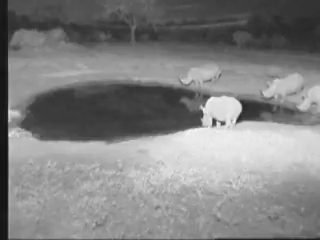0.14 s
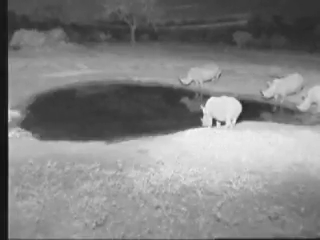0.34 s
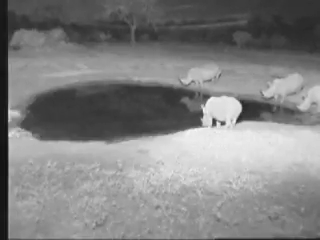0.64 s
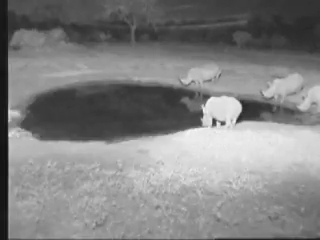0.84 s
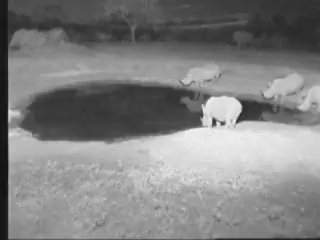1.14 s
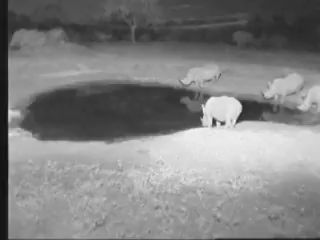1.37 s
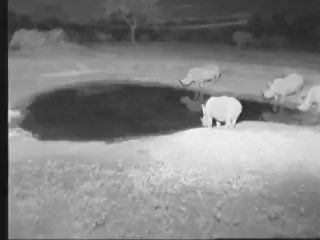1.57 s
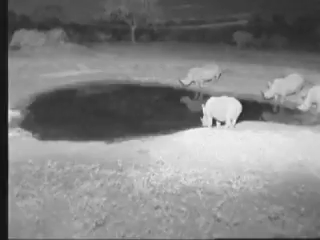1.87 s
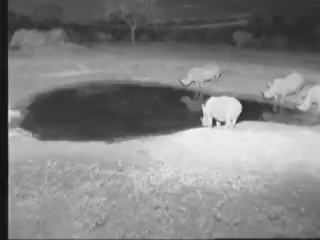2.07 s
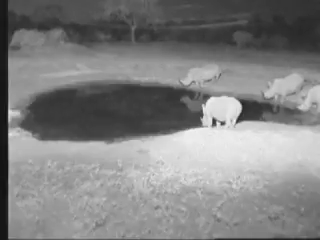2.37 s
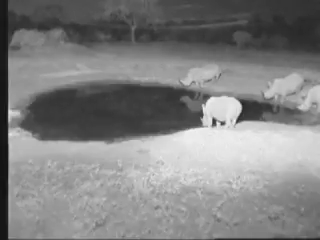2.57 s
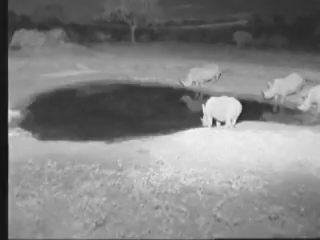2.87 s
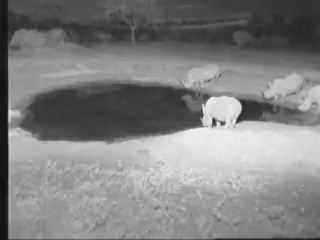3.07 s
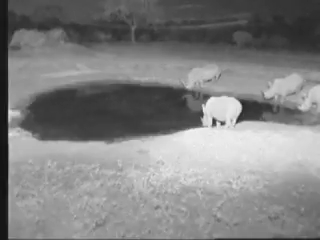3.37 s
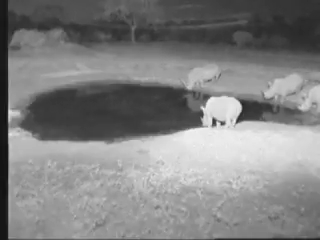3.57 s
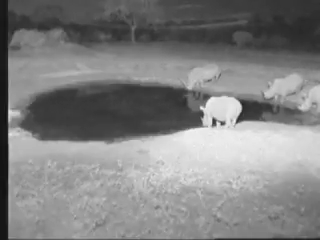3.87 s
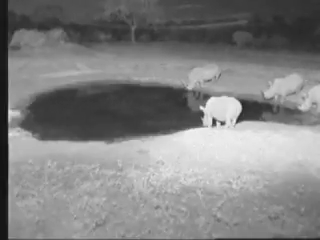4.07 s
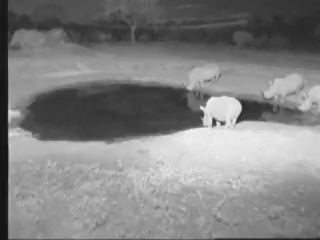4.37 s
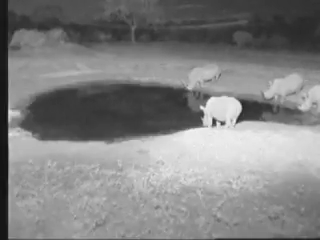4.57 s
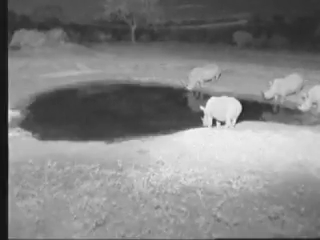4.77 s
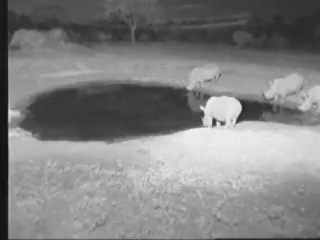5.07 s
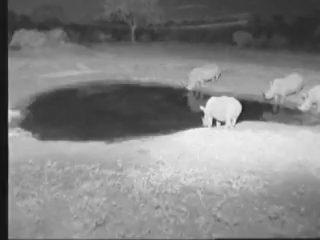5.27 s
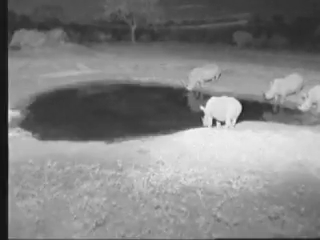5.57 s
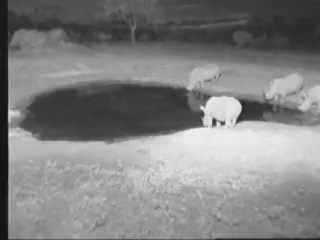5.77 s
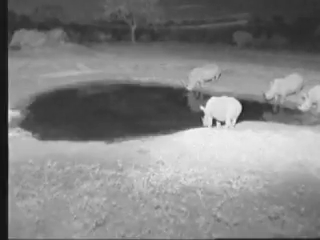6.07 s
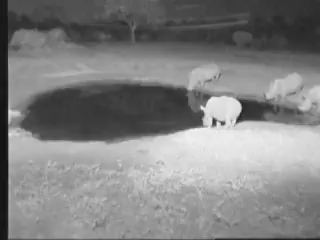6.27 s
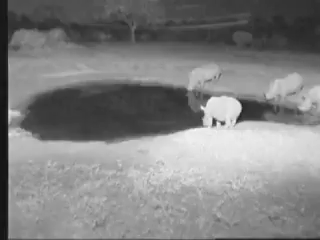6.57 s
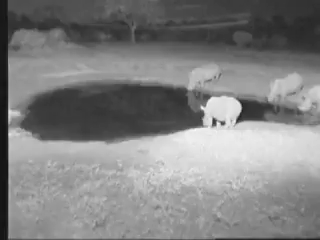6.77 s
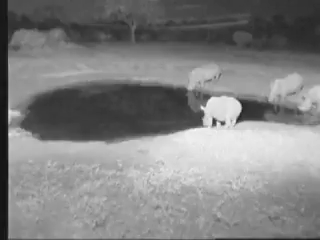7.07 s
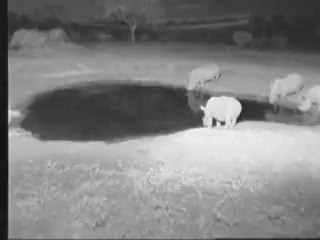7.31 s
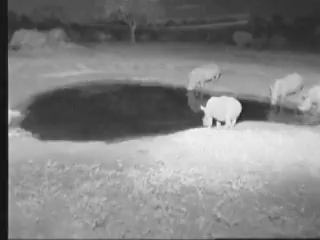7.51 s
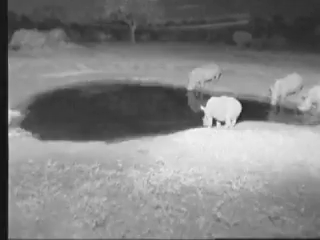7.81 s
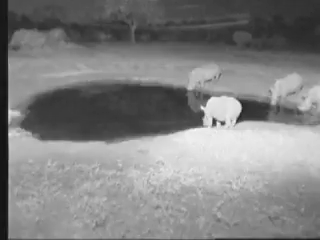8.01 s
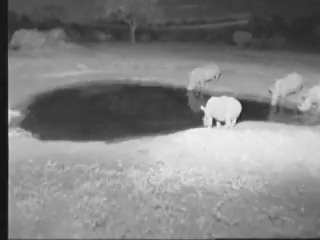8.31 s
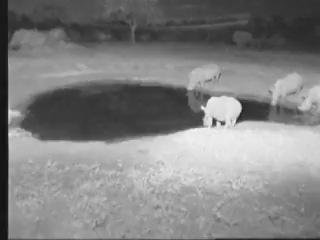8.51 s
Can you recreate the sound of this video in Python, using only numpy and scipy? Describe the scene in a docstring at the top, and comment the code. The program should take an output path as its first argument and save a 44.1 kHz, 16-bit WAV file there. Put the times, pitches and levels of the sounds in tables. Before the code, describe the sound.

Steady electrical hum, buzz and hiss over a night waterhole, with rhinos sloshing and dripping water before one loud, distorted breathy snort.

```python
"""Night waterhole with a snort

Night at a waterhole, heard by a fixed camera's single microphone. Mains hum, picture buzz (summed lines),
low thumps and hiss (shaped noise) never stop. Large animals slosh (bubble crackle through resonances) and
drip (short rising rings with splashes) at the water's edge; one draws breath and blows a loud snort
(noise through resonances) that overloads the input. A gulp is a gliding tone, far trickles narrow noise."""
import sys
import numpy as np
from scipy import signal
from scipy.fft import rfft, irfft, next_fast_len
from scipy.io import wavfile
from scipy.ndimage import uniform_filter1d, map_coordinates

SR = 44100
rng = np.random.default_rng(int(sys.argv[2]) if len(sys.argv) > 2 else 0)


def gain_from_decibels(decibels):
    """Convert decibel values to linear amplitude factors."""
    exponent = np.asarray(decibels, float) / 20
    return 10 ** exponent


def generate_wav(sig):
    """Save sig (samples, or channels by samples) to the path in sys.argv[1] as 16-bit PCM at SR."""
    pcm = np.round(np.clip(np.atleast_2d(sig).T, -1, 1) * 32767).astype(np.int16)
    wavfile.write(sys.argv[1], SR, pcm)


N = 381465
FIELD_HZ = 50  # picture fields; two make a frame


def unit(x):
    """Scales to rms 1."""
    return x / np.sqrt(np.mean(x ** 2) + 1e-20)


def along(points, hz):
    """Interpolates (frequency [Hz], value) points on a log frequency axis."""
    f, v = np.transpose(points)
    return np.interp(np.log(hz + 1), np.log(f + 1), v)


def curves(rows):
    """One curve per column after the time, then a gate open between the first and last row."""
    s, *cols = np.transpose(rows)
    t = np.arange(N) / SR
    gate = uniform_filter1d(1. * (t > s[0]) * (t < s[-1]), size=200)
    return [np.interp(t, s, c) for c in cols] + [gate]


def wobble(rate_hz):
    """Smooth random curve with rate_hz knots a second."""
    knots = rng.standard_normal(int(N * rate_hz / SR) + 4)
    return map_coordinates(knots, [np.arange(N) * rate_hz / SR])


def filtered(x, response):
    """x times a response of frequency."""
    m = next_fast_len(N + SR // 2)
    return irfft(rfft(x, m) * response(np.fft.rfftfreq(m, 1 / SR)), m)[..., :N]


def resonant(x, modes, low_hz):
    """x through parallel resonances of alternating sign, steeply cut below low_hz; rms 1."""
    def response(f):
        total = 0
        for k, (center_hz, width_hz, db) in enumerate(modes):
            damping = 1j * f * width_hz
            total = total + (-1) ** k * gain_from_decibels(db) * damping / (center_hz ** 2 - f * f + damping)
        return total / (1 + (low_hz / (f + 1)) ** 8)
    return unit(filtered(x, response))


def grainy(rate_hz, depth_db):
    """Noise whose strength flickers, as from many tiny bursts."""
    return rng.standard_normal(N) * gain_from_decibels(depth_db * wobble(rate_hz))


def crackle(rate_hz, depth_db, hush):
    """Tiny bursting bubbles: sparse clicks of scattered size, plus grainy noise scaled by hush."""
    size_db = depth_db * np.minimum(rng.exponential(size=N), 3)
    clicks = (rng.random(N) < rate_hz / SR) * rng.choice([-1, 1], size=N) * gain_from_decibels(size_db)
    return unit(clicks) + hush * grainy(200, 4.0)


def hum():
    """A rectifier draws two opposite pulses a cycle: odd multiples only, the higher ones lagging."""
    # mains lines: (multiple, level [dB rms])
    partials = [(1, -37.5), (3, -33), (5, -35.5), (7, -42), (9, -45.5), (11, -49), (15, -55.5), (17, -55)]
    mains_hz = 49.867
    turn = 2 * np.pi * mains_hz * np.arange(N) / SR - .07 + .05 * wobble(.5)
    out = np.zeros(N)
    for k, db in partials:
        phase = 2.93 - .23 * k - 2.03 * np.log(k)
        out += np.sqrt(2) * gain_from_decibels(db + 0.23 * wobble(7.5)) * np.cos(k * turn + phase)
    return out


def picture_buzz():
    """Each picture field leaks a slow sag and one sharp spike; the sag beats slowly against the mains."""
    # slow part: (multiple of field rate, level [dB rms])
    sag_lines = [(1, -42), (2, -48)]
    # sharp part: (frequency [Hz], level [dB rms per line])
    spike_levels = [(150, -55), (500, -59), (900, -59), (2000, -66), (6000, -68.5)]
    turn = 2 * np.pi * FIELD_HZ * np.arange(SR // FIELD_HZ) / SR
    sag = sum(gain_from_decibels(db) * np.cos(k * (turn + .7) - 2.6) for k, db in sag_lines)
    spike = sum(gain_from_decibels(along(spike_levels, k * FIELD_HZ)) * np.cos(k * (turn + 1.55) + .3)
                for k in range(3, 130))
    return np.sqrt(2) * (np.resize(sag, N) + np.resize(spike, N) * gain_from_decibels(0.23 * wobble(30)))


def hiss():
    """Amplifier noise, rising into the bass."""
    # relative noise spectrum: (frequency [Hz], density [dB per Hz])
    spectrum = [(8, 28.5), (25, 21), (50, 16), (80, 11), (200, 9.5), (600, 6), (1340, 0.5), (2230, -1.5),
                (5000, -0.5), (7150, 0), (7350, -31), (8200, -21.5), (11000, -21.5), (12600, -12.5),
                (12800, -62)]
    noise = filtered(rng.standard_normal(N), lambda hz: gain_from_decibels(along(spectrum, hz)) * (hz > 2))
    return gain_from_decibels(-33 + 0.12 * wobble(2.84)) * unit(noise)


def sloshes():
    """Each movement in the water is a quick swell of crackle in three groups of resonances."""
    # movements: (time [s], peak level [dB], low group [dB re peak], high group [dB re peak], length [s])
    moves = [(0.0044, -7.5, -12, -11.5, 0.05), (0.036, -14.5, -4.5, -8.5, 0.084),
             (0.13, -15.5, -4, -4, 0.057), (0.315, -17.5, -6, -9, 0.042), (0.486, -26, -3, -13, 0.051),
             (0.654, -10.5, -9.5, -12.5, 0.068), (0.738, -18.5, -7, -10, 0.12), (0.86, -21.5, 4, -30, 0.11),
             (1.048, -26.5, -17, -7, 0.084), (1.264, -23, -27, -14, 0.086), (1.378, -21, -7.5, -20, 0.069),
             (1.513, -25.5, -3, -11, 0.14), (1.841, -17.5, -0.5, -16, 0.13), (1.964, -11, -5, -10, 0.058),
             (2.036, -14, -2, -31, 0.071), (2.283, -26, -12, -14, 0.072), (2.452, -15, 1.5, -30, 0.094),
             (2.558, -17.5, -3, -12, 0.1), (2.873, -18.5, -9.5, -22, 0.072),
             (3.075, -12.5, -2.5, -32, 0.048), (3.142, -23, -4, -10, 0.083), (3.818, -24, -2, -9, 0.068),
             (3.912, -21.5, -2.5, -6, 0.072), (5.174, -18, -2, -4, 0.022)]
    # low, middle and high groups of water resonances: (center [Hz], width [Hz], relative gain [dB])
    mode_groups = [
        [(740, 200, 26), (1520, 470, 29.5)],
        [(2610, 490, 2), (3530, 630, -5.5)],
        [(5030, 510, 17), (6700, 350, -17)],
    ]
    swell, t = np.zeros((3, N + SR)), np.arange(SR // 2) / SR
    for s, db, low_db, high_db, length_s in moves:
        decay = np.exp(-(t / length_s) ** 3) + 0.042 * np.exp(-t / 0.23)
        shape = (1 - np.exp(-t / 0.0083)) * decay
        group_db = np.array([[low_db], [0], [high_db]])
        swell[:, round(s * SR):][:, :len(t)] += gain_from_decibels(db + group_db) * shape
    crest = 3  # nominal peak over rms
    bursts = crackle(350, 2.8, hush=0)  # the larger bubbles sound in all three groups
    out = np.zeros(N)
    for level, modes in zip(swell, mode_groups):
        source = 0.76 * bursts + crackle(900, 5.6, hush=1)
        out += level[:N] / crest * resonant(source, modes, low_hz=500)
    return out


def drips():
    """Drops and smacks: a few cycles swell and die with rising pitch, then splash noise around that pitch."""
    # drops: (time of peak [s], ring peak [dB], pitch at peak [Hz], half length [s])
    drop_rows = [(.027, -6.5, 3530, 0.00049), (0.135, -24, 2800, 0.0017), (.329, -22, 6700, 0.0016),
                 (0.685, -18, 965, 0.002), (0.876, -18.5, 800, 0.0008), (1.238, -15, 6480, 0.0015),
                 (1.683, -5.5, 2710, 0.0015), (1.864, -17, 845, 0.0011), (1.994, -16, 2740, 0.0024),
                 (2.671, -24, 1950, 0.0036), (3.092, -9.5, 2490, 0.002), (3.095, -15, 870, 0.0014),
                 (3.346, -18, 1250, 0.007), (4.876, -4, 4900, 0.0005), (5.026, -6.5, 2970, 0.0009),
                 (5.407, -28, 1380, 0.0015), (5.427, 5, 2980, 0.0016), (5.428, -3, 1760, 0.0011),
                 (5.434, -1, 1300, 0.00062), (6.508, -16, 1000, 0.0035), (6.5127, -8.5, 1180, 0.0014),
                 (6.513, -25.5, 2700, 0.0066), (7.554, -16, 1160, 0.001), (7.561, -27, 2700, 0.0077),
                 (7.561, -18, 3500, 0.0017), (7.5626, -8, 5420, 0.0013), (7.565, -22, 6700, 0.0015)]
    rise = 0.048  # share of pitch gained over two half lengths
    spread = 1.44  # splash band edges, ratio to pitch
    out, lead = np.zeros(N + SR), SR // 50
    t = np.arange(-lead, SR // 5) / SR
    after = np.maximum(t, 0)
    splash_decay = 0.29 * gain_from_decibels(-60 * after / 0.013) + 0.054 * gain_from_decibels(-60 * after / 0.24)
    for s, db, hz, half_s in drop_rows:
        envelope = np.exp(-(t / half_s) ** 2 / np.where(t < 0, 1, 2))
        ring = np.cos(2 * np.pi * hz * t * (1 + rise * t / half_s / 4)) * envelope
        edges_hz = [hz / spread, min(hz * spread, 7000)]
        band = signal.butter(2, edges_hz, "band", fs=SR, output="sos")
        splash = unit(signal.sosfilt(band, rng.standard_normal(len(t))))
        splash *= np.clip(.5 + t / half_s / 4, 0, 1) * splash_decay
        out[round(s * SR) - lead:][:len(t)] += gain_from_decibels(db) * (ring + splash)
    return out[:N]


def banks(x):
    """A few blurred echoes and a short diffuse tail, as convolution with shaped noise."""
    # echoes off ground and banks: (delay [s], smear [s], energy [dB])
    echo_rows = [(.005, 0.003, -25), (0.014, 0.0032, -34), (0.033, .03, -25)]
    t = np.arange(SR // 4) / SR
    echoes = sum(gain_from_decibels(db) * (t > delay_s) * (t < delay_s + smear_s) / np.sqrt(smear_s * SR)
                 for delay_s, smear_s, db in echo_rows)
    tail = (echoes + gain_from_decibels(-31.5 - 60 * t / 0.13)) * rng.standard_normal(len(t))
    return signal.fftconvolve(x, tail)[:N]


def supply_bumps():
    """Rounded low thumps a few frames apart, each with a shallow dip; probably the supply voltage jumping."""
    # spacing: (picture frames to the next thump, chance [share])
    gap_rows = [(2, .5), (3, .27), (4, .14), (5, .09)]
    frame_s, first_frame_s = 2 / FIELD_HZ, .027
    bump_db, scatter_db = -22, 0.5
    gaps, chance = np.transpose(gap_rows)
    s = first_frame_s + frame_s * np.cumsum(rng.choice(gaps, size=120, p=chance))
    height = gain_from_decibels(bump_db + scatter_db * rng.standard_normal(len(s)))
    kicks = np.bincount(np.round(s * SR).astype(int), height, N)[:N]
    t = np.arange(-SR // 10, SR // 10) / SR
    shape = np.exp(-(t / 0.014) ** 2) - 0.2 * np.exp(-((t - .035) / 0.034) ** 2)
    return signal.fftconvolve(kicks, shape, "same")


def gulp():
    """An air pocket closes: a thin, broken tone that shoots up."""
    start_s, length_s, level_db = 2.54, 0.04, -22
    from_hz, to_hz, bend = 1350, 3740, 2  # the glide steepens by this power of time
    done = np.clip((np.arange(N) / SR - start_s) / length_s, 0, 1)
    hz = from_hz * (to_hz / from_hz) ** done ** bend
    swell = np.sin(np.pi * done ** 1.6) ** 0.19  # rounding leaves the last pitch about 60 dB down
    phase = 2 * np.pi * np.cumsum(hz * (1 + .025 * wobble(300))) / SR
    return np.sqrt(2) * swell * gain_from_decibels(level_db + 2.5 * wobble(200)) * np.sin(phase)


def trickle():
    """Soft swells of narrow noise from across the pool."""
    # faint far water: (time of peak [s], length [s], center [Hz], level at peak [dB rms])
    swells = [(5.877, 0.082, 1350, -42), (2.712, 0.064, 1860, -38.5), (7.79, 0.039, 1830, -36),
              (7.95, .05, 5440, -42), (8.103, 0.1, 2700, -44), (8.405, 0.15, 2700, -42)]
    t = np.arange(N) / SR
    out = np.zeros(N)
    for s, length_s, hz, db in swells:
        noise = resonant(grainy(60, 2.0), [(hz, 200, 0)], low_hz=600)
        out += gain_from_decibels(db) * np.exp(-((t - s) / length_s) ** 2) * noise
    return out


def inhale():
    """Air drawn in softly: turbulence in two bands of resonances."""
    # strength: (time [s], main band [dB rms], high band before a 2 dB cut [dB rms])
    effort = [(2.85, -39, -40), (2.92, -37.5, -34), (3.052, -32, -41), (3.312, -37, -41.5),
              (3.476, -36, -41.5), (3.85, -32.5, -33), (4.2, -38, -41.5)]
    db, high_db, gate = curves(effort)
    main = resonant(grainy(120, 0.74), [(2700, 980, -0.87), (3500, 1000, -0.82)], low_hz=1900)
    high = resonant(grainy(40, 2.4), [(4380, 290, -6), (5800, 660, -1)], low_hz=3500)
    return gate * (gain_from_decibels(db) * main + gain_from_decibels(high_db - 2) * high)


def snort():
    """Air blown out: turbulence in chest, nose and nostrils, with fluttering flaps."""
    # effort: (time [s], level in the nose [dB rms])
    effort = [(4.212, -31), (4.22, -26), (4.285, -12), (4.42, -10.5), (4.56, -6.5), (4.74, -12),
              (4.9, -19.5), (5.1, -29), (5.17, -36), (5.3, -53)]
    # resonances of each part: (center [Hz], width [Hz], relative gain [dB])
    chest_modes = [(365, 49, -2), (510, 138, 1.5), (688, 320, -1)]
    nose_modes = [(1250, 660, -2.5), (2310, 650, 1), (2800, 890, 1), (3920, 670, -3.5)]
    nostril_modes = [(4850, 1450, -1), (6430, 780, 1.5)]
    reference_db = -15  # effort at which the balances below hold
    chest_re_nose_db, chest_growth = -1.5, .12  # growth in dB per dB of effort
    nostril_re_nose_db, nostril_growth = -0.85, 0.13
    nose_db, gate = curves(effort)
    chest_db = chest_re_nose_db + chest_growth * (nose_db - reference_db)
    nostril_db = nostril_re_nose_db + nostril_growth * (nose_db - reference_db)
    blow = resonant(grainy(200, 0.63), nose_modes, low_hz=800)
    blow += gain_from_decibels(chest_db + 1.1 * wobble(20)) * resonant(grainy(80, 0.49), chest_modes, low_hz=246)
    blow += gain_from_decibels(nostril_db) * resonant(grainy(200, 0.64), nostril_modes, low_hz=2980)
    return gate * gain_from_decibels(nose_db + 0.12 * wobble(60)) * blow


def scene():
    """One microphone feeds both channels; outside sound is cut steeply above its 7100 Hz band edge."""
    drops = drips()
    outside = sloshes() + drops + banks(drops) + gulp() + trickle() + inhale() + snort()
    outside = filtered(outside, lambda hz: 1 / (1 + (hz / 7100) ** 60))
    electric = hum() + picture_buzz() + hiss() + supply_bumps()
    return np.tile(outside + electric, (2, 1))


def band_limit(x):
    """A steep low-pass at the top of the band."""
    return signal.sosfilt(signal.butter(12, 15800, fs=SR, output="sos"), x)


def record(dry):
    """The input stage clips and loses its top; each channel then sits on an offset and clips at full scale."""
    # steady offset of each channel: (level [full scale])
    channel_offset = [
        [-.128],
        [-.157],
    ]
    stage = filtered(np.clip(dry, -1.05, 1.2), lambda hz: 1 / (1 + (hz / 12700) ** 40))
    mix = np.clip(stage + channel_offset, -1, 1)
    return band_limit(mix)


dry = scene()
out = record(dry)
generate_wav(out)
```